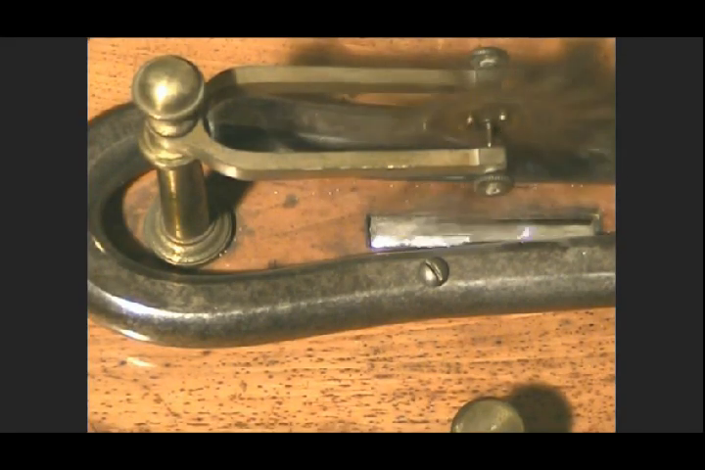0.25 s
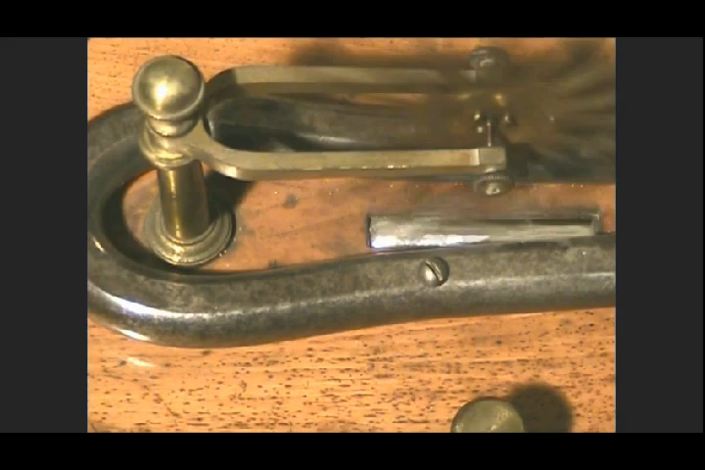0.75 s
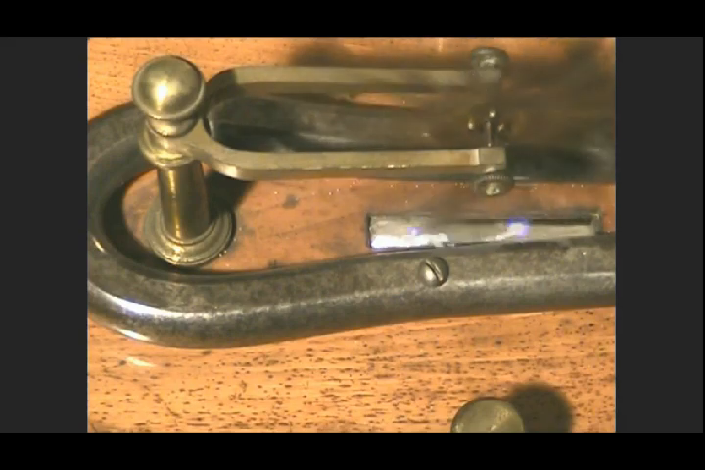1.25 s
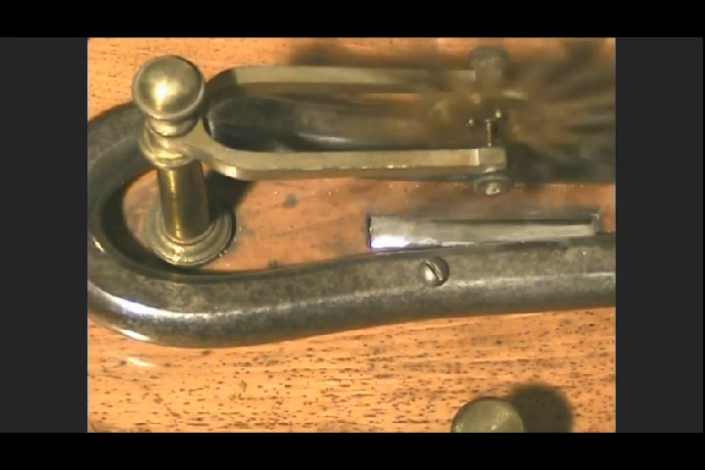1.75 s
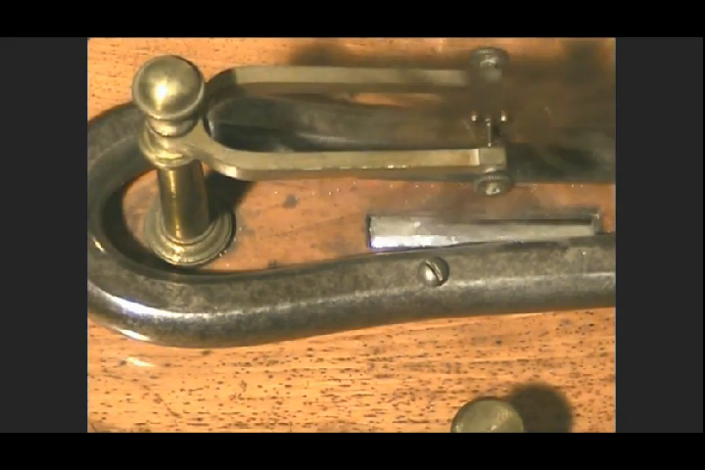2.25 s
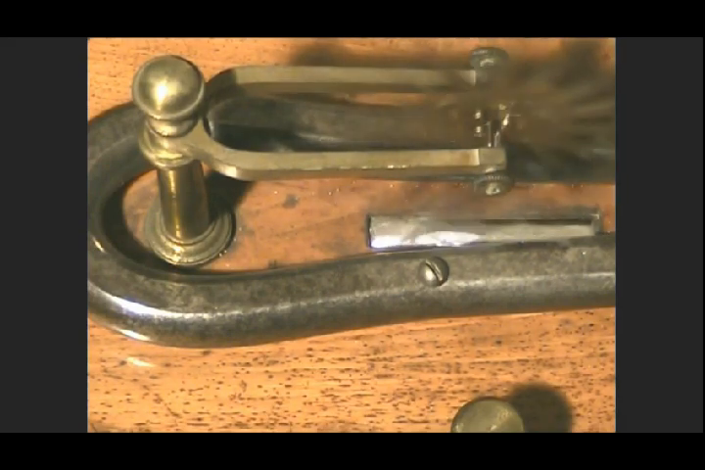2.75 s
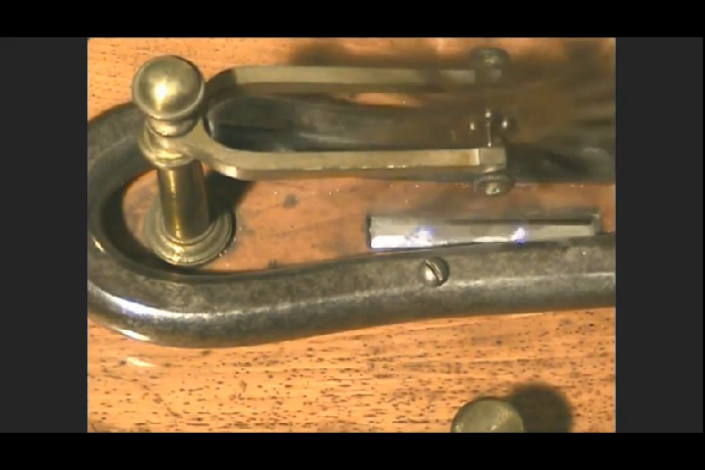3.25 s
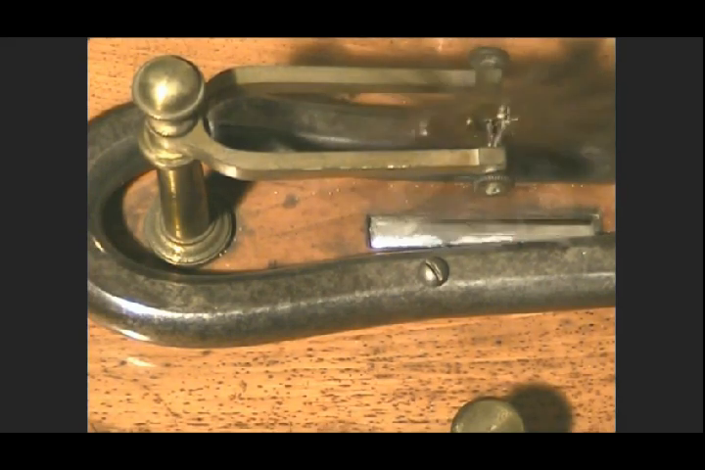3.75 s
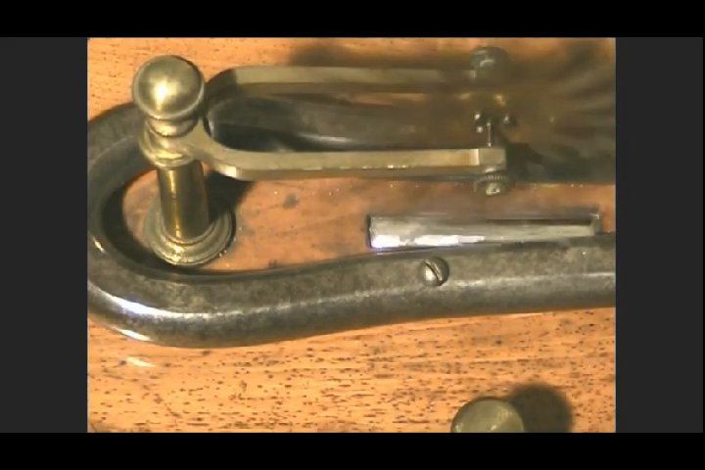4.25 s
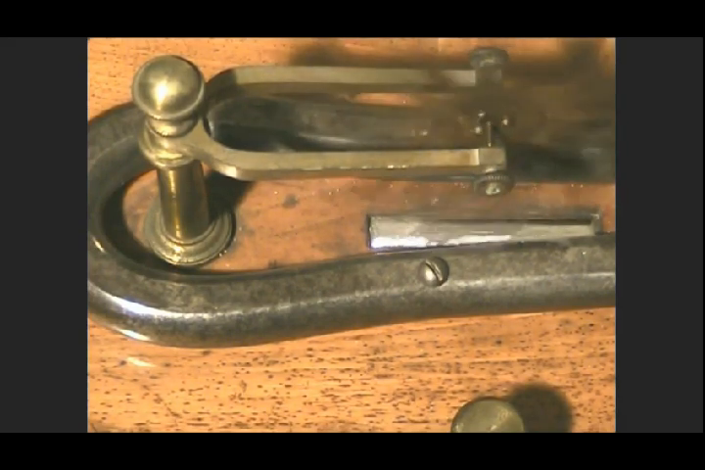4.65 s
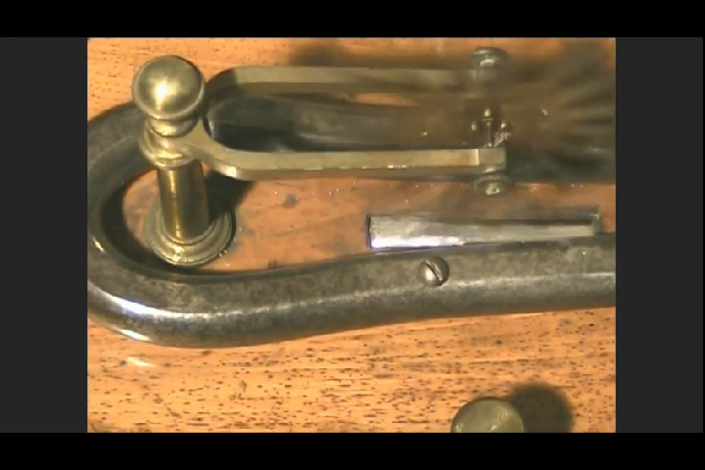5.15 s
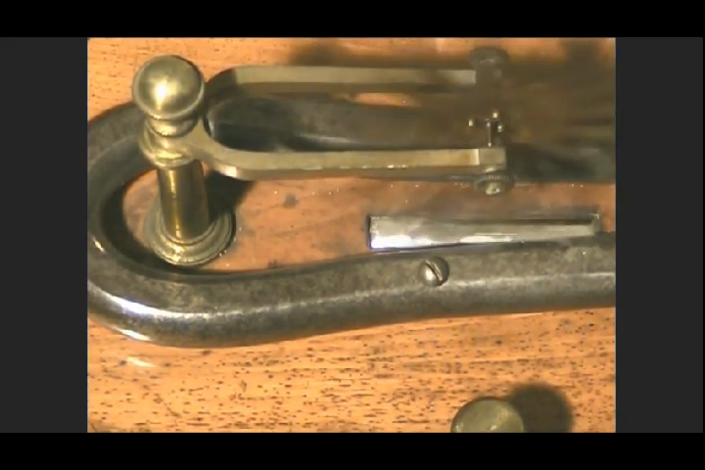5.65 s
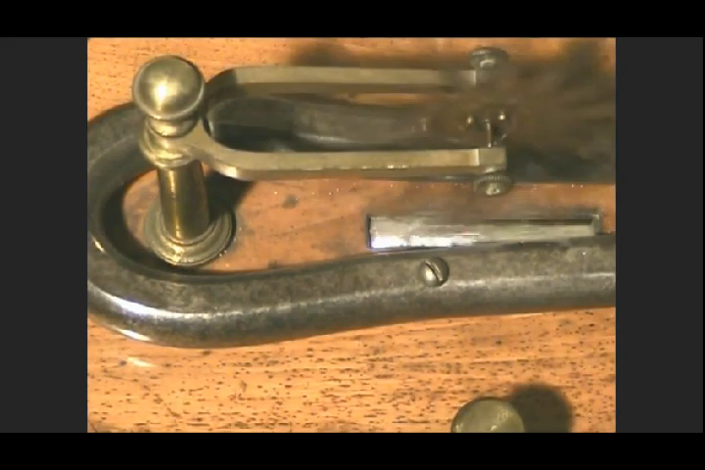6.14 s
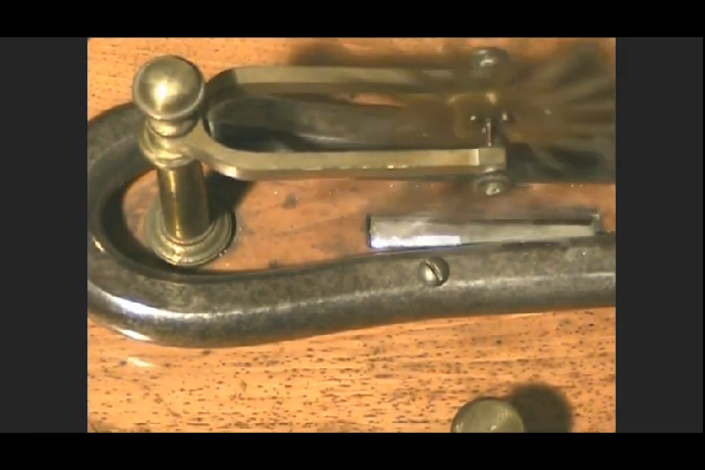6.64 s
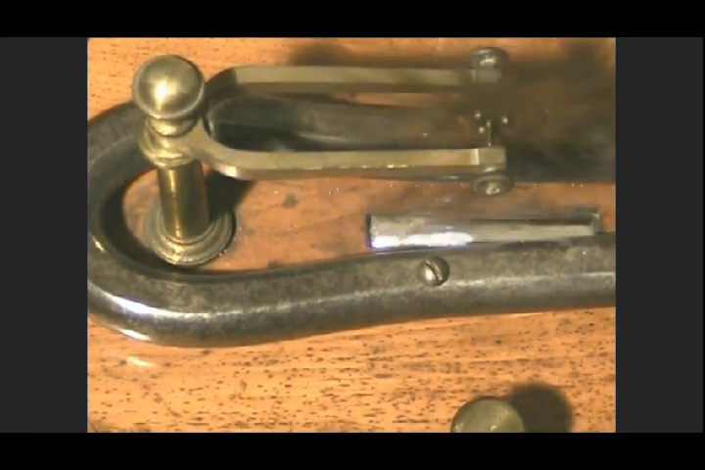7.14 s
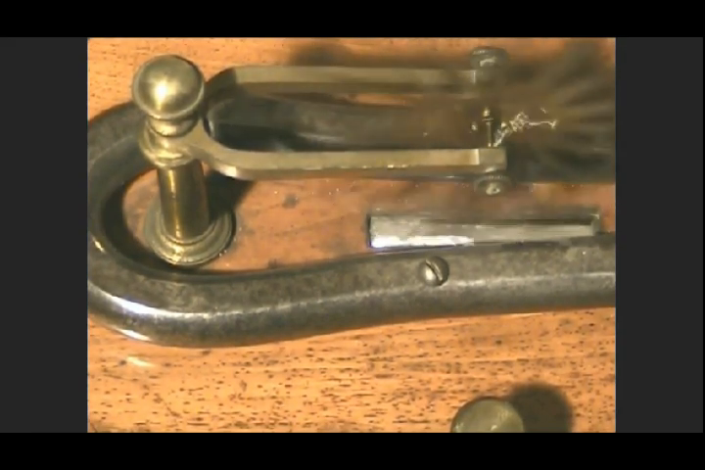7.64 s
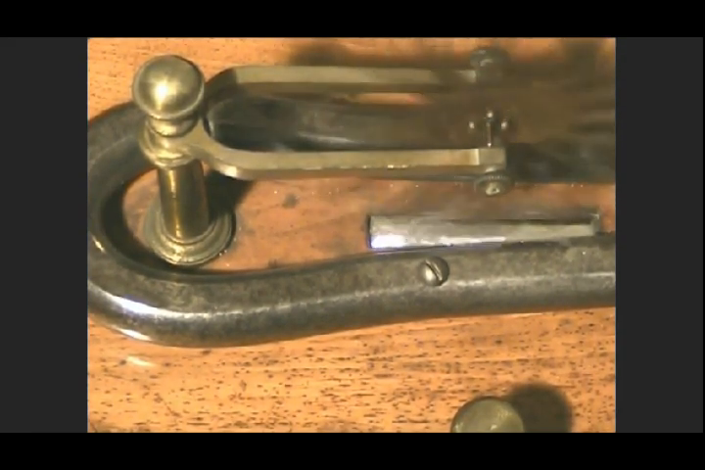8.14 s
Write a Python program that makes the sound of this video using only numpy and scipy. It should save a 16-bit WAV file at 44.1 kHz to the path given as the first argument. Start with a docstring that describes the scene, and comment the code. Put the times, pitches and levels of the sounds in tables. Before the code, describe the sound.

A small toothed metal wheel buzzes and rattles at a hundred pulses a second, with sharp irregular electric spark snaps in a small room.

```python
"""In a small room, a toothed copper wheel on rectified mains current dips through mercury on a wooden base.
Impulses at the sparks, where a tooth leaves the mercury, excite housing, body and base resonances.
Each current hump, a hundred a second, jolts the axle in its brass fork: noise and impulses ring the frame
near 1.5 kHz and make the wheel chatter; clear knocks and soft singing swells of the fork stand out.
The room adds echoes, hum and rumble; hiss, narrow drones and a camcorder's faint tick lie underneath."""
import sys
import numpy as np
from scipy import signal
from scipy.fft import rfft, irfft, next_fast_len
from scipy.io import wavfile
from scipy.ndimage import uniform_filter1d

SR = 44100
rng = np.random.default_rng(int(sys.argv[2]) if len(sys.argv) > 2 else 0)


def pcm_store(signal):
    """Save signal as 16-bit PCM."""
    levels = np.round(np.clip(np.atleast_2d(signal), -1, 1) * 32767)
    wavfile.write(sys.argv[1], SR, levels.astype(np.int16).T)


N = 369999

# spectral shape of the room's hum in the centre: pitch_hz [Hz], shape_db [dB per Hz, relative]
HUM_MID_SHAPE = [(20, -24), (55, -3), (115, -7.5), (180, -0.5), (290, -6.5), (430, -9), (700, -15),
                 (950, -8), (1200, -43)]
# spectral shape of the hum that differs between the channels: pitch_hz [Hz], shape_db [dB per Hz, relative]
HUM_SIDE_SHAPE = [(20, 2), (35, -5), (120, 0.5), (280, -0.5), (1200, -10.5), (2300, -13.5), (3450, -15.5),
                  (3600, -56)]
# spectral shape of the microphone hiss: pitch_hz [Hz], shape_db [dB per Hz, relative]
HISS_SHAPE = [(600, -38), (1000, 10), (3500, -3), (9000, -18), (12000, -11), (16000, -27)]
HUM_MID_DB, HUM_SIDE_DB, HISS_DB = -53, -51, -57  # rms
# narrow drones of the room and the camcorder: pitch_hz [Hz], width_hz [Hz], level_db [dB rms]
DRONE_BANDS = [(153.9, 3, -58.5), (210.8, 10.8, -56), (252.6, 16, -61.5), (364.8, 13, -59.5),
               (399.4, 5.7, -63), (501.7, 1.36, -71.5), (576.6, 10.4, -66.5)]

HUMP_HZ, HUMP_START_S = 100.03, .005
# chance scatter from hump to hump of the jolt and of the chatter
JOLT_SCATTER_DB, SCRAPE_SCATTER_DB = 4, 3.5
# gain of the buzz between knocks: time_s [s], gain_db [dB]
BUZZ_GAIN = [(0, -44.5), (0.26, -42), (0.72, -44.5), (1.1, -44), (1.45, -43), (1.82, -43), (2.15, -44),
             (2.55, -41.5), (3.2, -43.5), (3.48, -44), (3.75, -42.5), (4.15, -41.5), (4.58, -44),
             (5.0, -41.5), (5.35, -44), (5.7, -43), (6.24, -40.5), (6.72, -46), (6.98, -44), (7.45, -43),
             (7.8, -42.5), (8.39, -45)]
# dips of the buzz that end at once: start_s [s], end_s [s], depth_db [dB, reached if the dip lasts 21 ms]
BUZZ_PAUSES = [(0.0, 0.055, -8.5), (0.436, 0.478, -7), (0.714, 0.775, -11), (1.183, 1.213, -10),
               (1.614, 1.686, -7.5), (1.889, 1.93, -15), (2.23, 2.321, -15), (3.024, 3.074, -10),
               (3.291, 3.395, -10), (3.409, 3.455, -13), (3.552, 3.64, -10.5), (3.642, 3.665, -15),
               (4.12, 4.169, -12.5), (4.181, 4.2, -20), (4.226, 4.244, -17), (4.293, 4.365, -7),
               (5.031, 5.074, -16), (5.116, 5.15, -16), (5.473, 5.495, -20), (5.508, 5.558, -15),
               (5.697, 5.715, -17), (5.883, 5.91, -15), (6.34, 6.369, -9), (6.384, 6.412, -17),
               (6.684, 6.712, -24), (6.736, 6.773, -11), (6.763, 6.85, -12), (6.973, 7.052, -14.5),
               (7.098, 7.123, -35), (7.963, 8.036, -13), (8.284, 8.313, -18)]
BEARING_HZ = 1550  # the bearing passes force best around this
# close modes of the frame: pitch_hz [Hz], width_hz [Hz], gain_db [dB, relative]
FRAME_MODES = [(1471.3, 125, -0.5), (1541, 58.7, 7), (1627, 63, 3.5), (1658.3, 140, -6)]
# slender modes of the fork that ring on: pitch_hz [Hz], width_hz [Hz], gain_db [dB, relative]
FORK_MODES = [(902.5, 46, -15), (1078, 34.3, -3.5), (1320, 13, -11.5), (1880, 48, -17.5)]
# upper modes of wheel and fork: pitch_hz [Hz], width_hz [Hz], gain_db [dB, relative]
WHEEL_MODES = [(2532, 183, 5), (2922, 68, 10), (3138, 103, 5.5), (3437, 47, 5), (3720, 83, 4.5),
               (4004, 163, 5), (4794, 450, 0.5), (5533, 123, 2), (6140, 330, 4.5), (6923, 130, 7.5),
               (7200, 200, 3.5), (7880, 760, 4.5), (8900, 1750, -4), (9570, 154, 5), (10520, 650, 1),
               (12300, 2900, -18)]

# the tick repeats a bar of uneven beats
TICK_BAR_S, TICK_START_S = .18008, .031
# beats within the bar: start_s [s]
TICK_BEATS = [0, .04, .08, .14]
TICK_DB, TICK_SCATTER_DB = -49, 4  # typical peak, and its chance scatter

# clear knocks of the axle: start_s [s], ring_db [dB peak], chatter_db [dB against the ring, before a 4 dB cut]
AXLE_KNOCKS = [(0.1158, -32, -17), (0.134, -30, -32), (0.184, -30, -27), (0.1976, -32, -24),
               (0.2648, -31.5, -6), (0.286, -32.5, -1.5), (0.3032, -31, -16), (0.3253, -29, -14),
               (0.6131, -28.5, -12), (0.7149, -32.5, -18), (0.8075, -31, -5), (0.9734, -30.5, -14),
               (0.9853, -29.5, -17), (1.016, -32, -9), (1.074, -32, -20), (1.135, -32, -4),
               (1.3242, -29.5, -24), (1.4258, -27.5, -11), (1.4555, -25.5, -14.5), (1.4948, -27.5, -10),
               (1.5338, -30, -7), (1.6855, -28.5, -12.5), (1.7135, -31, -29), (1.794, -30, -15),
               (1.815, -28.5, -23), (1.936, -28.0, -13), (1.9756, -30.5, -8.5), (2.095, -30.0, -26),
               (2.1829, -31, -15), (2.2053, -33, -18), (2.394, -29.5, -17), (2.4427, -31.5, -26),
               (2.5242, -29, -16), (2.5452, -26, -14), (2.564, -30, -25), (2.5822, -27.5, -24),
               (2.6838, -32.5, -6.5), (2.6931, -26.5, -16), (3.0248, -27.5, -14), (3.123, -29, -13),
               (3.2083, -29.5, -13), (3.7562, -25, -17), (3.783, -29, -17), (3.8224, -31.5, -20),
               (3.9634, -28, -13), (3.983, -27.5, -22), (4.121, -30.5, -16), (4.253, -29, -12),
               (4.2747, -30, -19), (4.3135, -29, -9.5), (4.4045, -29.5, -13), (4.513, -30.5, -18),
               (4.853, -27, -16.0), (4.8723, -28.0, -17), (4.953, -26.5, -14), (5.093, -27.5, -17),
               (5.155, -28.5, -10), (5.253, -28, -15), (5.3328, -29.5, -13), (5.371, -29, -14),
               (5.385, -28.5, -13), (5.463, -30.5, -14), (5.4735, -28, -16), (5.631, -31, -19),
               (5.8246, -29.5, -21), (6.0864, -34, -22), (6.1219, -30, -17), (6.191, -34, -16),
               (6.233, -29, -14), (6.262, -31.5, -14), (6.3418, -27.5, -29), (6.4513, -31.0, -9.0),
               (6.722, -30.5, -7), (6.8522, -31, -17), (6.9424, -28, -11), (7.3136, -28.5, -21),
               (7.3436, -30, -14.0), (7.3829, -27.5, -21), (7.4327, -29.5, -27), (7.452, -30.5, -16),
               (7.462, -28, -13), (7.49, -29, -20), (7.501, -31.0, -12), (7.582, -31, -19),
               (7.609, -31.5, -14), (7.624, -30, -18), (7.7527, -29, -12), (7.7715, -36, -11),
               (7.821, -33, -16), (7.9029, -29, -16), (8.043, -32, -8), (8.3297, -28, -30)]

# sparks: start_s [s], level_db [dB], then against that level:
# lower_housing_db [dB], body_db [dB], base_knock_db [dB]
SPARK_EVENTS = [(0.1555, -26, 1, -26, -18.0), (0.288, -23.5, 5, -5, -18.0), (0.556, -3.5, 2.5, -17, -7.5),
                (0.7836, -30.5, 8, -9, -18.0), (0.8564, -0.5, -1, -14, -14), (1.1292, -12.5, 2, -13, -14),
                (1.2749, -16.5, 6, -6, -22), (1.2765, -10.5, -14, -13.5, -23), (1.279, -7, 1.5, -12.5, -28),
                (1.7882, -10.5, 0.0, -14.5, -18), (2.0434, -11, -1.5, -16, -27),
                (2.0515, -23, 6.0, -9, -18.0), (2.125, -23, 5.5, -10.0, -18.0),
                (2.7743, -7.5, 3, -13.5, -18), (2.9337, -8.5, 2.5, -12.5, -12), (2.9984, -4, -34, -17, -31),
                (3.1754, -2, 0.5, -15, -16), (3.2563, -1, -2.5, -14, -31), (3.674, -16.5, 8, -10.5, -16),
                (4.0729, -13.5, 1.5, -15, -23), (4.0836, -24, 8, -8, -18.0),
                (4.374, -3.5, 1.5, -13.5, -11.5), (5.0737, -32.0, 7.0, -3, -18.0),
                (5.0824, -26.5, 2, -5, -18.0), (5.2431, -5, 2, -12, -33), (5.3127, -17.5, -5, -11, -16),
                (5.5746, -4.5, 1, -12, -14.5), (6.4254, -15.5, 10.5, -10, -12),
                (6.5036, -5.5, -1, -12.5, -14), (6.592, -22.5, 0, -9, -20), (6.594, -28, 6, -12.0, -18.0),
                (6.863, -2.5, -2, -15, -13.0), (7.7757, -14.5, 1.0, -10, -21), (7.855, -3.5, 0, -15, -13.5),
                (8.1139, -1.0, 1, -14, -14)]
# a spark's bounces off magnet and base: delay_ms [ms], gain [ratio, negative when inverted]
SPARK_BOUNCES = [(.34, 0.26), (0.401, 0.14), (.50, -0.023), (.80, 0.053), (1.2, -0.0064)]
# resonances of the microphone housing: pitch_hz [Hz], width_hz [Hz], gain_db [dB, relative]
HOUSING_MODES = [(10790, 1100, 15), (13200, 740, 8), (14650, 1300, 11)]

# swells of the fork's main mode: start_s [s], length_s [s], level_db [dB rms over the swell]
FORK_SINGS = [(0.2, 0.29, -55), (1.356, 0.19, -49), (1.927, 0.15, -54), (2.325, 0.074, -52),
              (2.843, 0.22, -55), (3.89, .17, -61.5), (4.91, 0.35, -57), (6.217, 0.091, -50.5),
              (6.884, 0.077, -54.5), (7.39, 0.21, -58)]

# echoes off near surfaces: delay_ms [ms], gain_db [dB], top_hz [Hz]
WALL_ECHOES = [(5.6, -16.5, 5500), (8.8, -20, 6470)]
# decay time of the tail; gain of its noise before filtering; further gain of its part unlike between channels
ROOM_T60_S, ROOM_DB, ROOM_SIDE_DB = 0.3, -37.5, -7

LEFT_DB = .95  # left against right, below about 3.5 kHz
TOP_HZ = 16500


def undb(db):
    """Logarithmic amplitude scale: decibels to gain."""
    return 10 ** (np.asarray(db, float) / 20)


def level(x, db):
    """Mean-square power: scale a signal to the given rms level."""
    return x * undb(db) / np.sqrt(np.mean(x ** 2))


def ring(x, modes):
    """Modal superposition: resonances with dB gain at the centre, neighbours in opposite phase."""
    out = 0
    for k, (pitch_hz, width_hz, gain_db) in enumerate(modes):
        b, a = signal.iirpeak(pitch_hz, pitch_hz / width_hz, SR)
        out = out + (-1) ** k * undb(gain_db) * signal.lfilter(b, a, x)
    return out


def strikes(start_s, size):
    """Impulsive excitation: impulses of given size at the given times."""
    out = np.zeros(N)
    index = np.clip((np.asarray(start_s) * SR).astype(int), 0, N - 1)
    np.add.at(out, index, size)
    return out


def fade(x, rise_s, fall_s):
    """Exponential relaxation: smear impulses into bumps of peak 1 that rise and die away."""
    t = np.arange(int(8 * fall_s * SR)) / SR
    bump = (1 - np.exp(-t / rise_s)) * np.exp(-t / fall_s)
    return np.abs(signal.fftconvolve(x, bump / bump.max())[:N])


def wander(db):
    """Slow random modulation: a gain that drifts several times a second by db rms."""
    drift = uniform_filter1d(rng.standard_normal(N), size=2500)
    drift = uniform_filter1d(drift, size=2500)
    return undb(level(drift, 0) * db)


def coloured(points, db):
    """Spectral shaping: steady noise whose spectrum follows the points, set to an rms level."""
    pitch_hz, shape_db = np.transpose(points)
    size = next_fast_len(N)
    f = np.maximum(np.arange(size // 2 + 1) * SR / size, 1)
    gain = undb(np.interp(np.log(f), np.log(pitch_hz), shape_db, -90, -90))
    noise = rng.standard_normal(size)
    return level(irfft(rfft(noise) * gain, size)[:N], db)


def drones():
    """Narrow-band noise: each resonance filters noise into a drone of drifting strength."""
    out = 0
    for pitch_hz, width_hz, level_db in DRONE_BANDS:
        band = ring(rng.standard_normal(N), [(pitch_hz, width_hz, 0)])
        out = out + level(wander(2.4) * band, level_db)
    return out


def rumble():
    """Low resonance under random force: narrow rumble near 35 Hz with one swell of 11 dB."""
    swell_db = 11 * np.exp(-((np.arange(N) / SR - 4.38) / .18) ** 2)
    low_noise = ring(rng.standard_normal(N), [(35.0, 7.8, 0)])
    return undb(swell_db) * level(low_noise, -59.0)


def looseness():
    """Amplitude modulation: gain of the buzz over time, sinking into each pause."""
    t = np.arange(N) / SR
    db = np.interp(t, *np.transpose(BUZZ_GAIN))
    for start_s, end_s, depth_db in BUZZ_PAUSES:
        db += depth_db * np.clip((t - start_s) / 0.021, 0, 1) * (t < end_s)
    return undb(db)


def frame(force):
    """Coupled resonators: the bearing filters the force on the frame; twice-filtered fork modes add to it."""
    fork = 0
    for pitch_hz, width_hz, gain_db in FORK_MODES:
        once = ring(force, [(pitch_hz, width_hz, 0)])
        fork = fork + ring(once, [(pitch_hz, width_hz, gain_db)])
    through_bearing = ring(force, [(BEARING_HZ, 330, 0)])
    return ring(through_bearing, FRAME_MODES) + fork


def buzz(when_s, jolt_db, loose):
    """Periodic forced vibration: each hump pushes noise and one impulse into the frame."""
    push = fade(strikes(when_s, undb(jolt_db)), 0.00023, 0.0031) + 0.2
    shake = push * rng.standard_normal(N) + strikes(when_s, undb(jolt_db + 25.0))
    # the pauses act on the force, so the frame rings on into them
    return frame(loose * shake) * undb(1.0) / np.std(frame(shake))


def chatter(when_s, jolt_db, lucks, loose):
    """Frictional contact noise: many tiny contacts during each push, with a tick at its start."""
    out = 0
    # the lower and the upper modes are set off unevenly from hump to hump
    for modes, luck in zip((WHEEL_MODES[:7], WHEEL_MODES[7:]), lucks):
        scrape_db = jolt_db + SCRAPE_SCATTER_DB * luck
        scrape = fade(strikes(when_s, undb(scrape_db)), 0.0003, 0.0055) + 0.34
        grit = rng.standard_normal(N) * undb(3.7 * rng.standard_normal(N))
        ticks = strikes(when_s, undb(scrape_db + 20.5))
        force = loose * (scrape * grit + ticks)
        # as the wheel turns, each mode comes and goes
        for k, mode in enumerate(modes):
            out = out + (-1) ** k * wander(2.3) * ring(force, [mode])
    return level(out, -49)


def knocks():
    """Impact response: each blow rings the frame with either sign and sets off a burst of chatter."""
    start_s, ring_db, chatter_db = np.transpose(AXLE_KNOCKS)
    blow = frame(np.eye(1, 8192)[0])
    sign = np.sign(rng.standard_normal(len(start_s)))
    blows = strikes(start_s - .0008, sign * undb(ring_db))
    ringing = signal.fftconvolve(blows, blow / np.abs(blow).max())[:N]
    burst = fade(strikes(start_s - .001, undb(ring_db + chatter_db)), 0.00087, 0.0062)
    return ringing + burst * level(ring(rng.standard_normal(N), WHEEL_MODES), -4.0)


def singing():
    """Frequency-modulated sine: soft swells of the fork's main mode, its pitch wavering by 11 Hz rms."""
    t = np.arange(N) / SR
    waver_hz = level(uniform_filter1d(rng.standard_normal(N), size=1200), 20.77)
    gain = 0
    for start_s, length_s, level_db in FORK_SINGS:
        gain = gain + undb(level_db) * np.sin(np.pi * np.clip((t - start_s) / length_s, 0, 1))
    phase = 2 * np.pi * np.cumsum(FORK_MODES[1][0] + waver_hz) / SR
    return 2 * gain * np.sin(phase)


def axle():
    """Excitation by current humps: each jolts the axle by a chance amount; knocks and singing are added."""
    humps_s = np.arange(HUMP_START_S, N / SR, 1 / HUMP_HZ)
    chance = rng.standard_normal((4, len(humps_s)))
    when_s = humps_s + 0.0005 * chance[0]
    jolt_db = JOLT_SCATTER_DB * chance[1]
    loose = looseness()
    driven = buzz(when_s, jolt_db, loose) + chatter(when_s, jolt_db, chance[2:], loose)
    return driven + knocks() + singing()


def camera_tick():
    """Damped impulse response: two modes, each filtered twice, tick faintly in a limping rhythm."""
    bars_s = np.arange(TICK_START_S, N / SR - TICK_BAR_S, TICK_BAR_S)
    start_s = np.ravel(bars_s[:, None] + TICK_BEATS)
    scatter_db = TICK_SCATTER_DB * rng.standard_normal(len(start_s))
    modes = [(1990, 150, 0), (3050, 220, -5)]
    one = ring(ring(np.eye(1, 2048)[0], modes), modes)
    return signal.fftconvolve(strikes(start_s, undb(TICK_DB + scatter_db)), one / np.abs(one).max())[:N]


def sparks():
    """Impulse response with reflections: a snap and its bounces ring housing, broad body and wooden base."""
    start_s, level_db, lower_db, body_db, base_db = np.transpose(SPARK_EVENTS)
    hz = np.arange(129) * SR / 256
    # each bounce is a delay, written as a phase turn in the spectrum
    bounces = sum(gain * np.exp(-2j * np.pi * hz * ms / 1000) for ms, gain in SPARK_BOUNCES)
    snap = irfft(1 + bounces)
    lower, *uppers = (ring(snap, [mode]) for mode in HOUSING_MODES)
    upper = sum(uppers)
    housing_peak = np.abs(lower + upper).max()
    body = -ring(snap, [(4750, 8000, 4.6)])
    base_knock = -ring(snap, [(535, 1550, -2.0)])
    # body and base are both scaled by the body's peak within 2-5 kHz
    band = signal.butter(2, [2000, 5000], "band", fs=SR)
    body_peak = np.abs(signal.lfilter(*band, body)).max()
    parts = [(0, upper / housing_peak), (lower_db, lower / housing_peak),
             (body_db, body / body_peak), (base_db, base_knock / body_peak)]
    out = 0
    for part_db, part in parts:
        hits = strikes(start_s - 5 / SR, undb(level_db + part_db))
        out = out + signal.fftconvolve(hits, part)[:N]
    return out


def room(x):
    """Reflection and reverberation: two dull echoes, then a dense noise tail whose treble dies first."""
    t = np.arange(int(.5 * SR)) / SR
    fall = np.exp(-np.log(1000) * t / ROOM_T60_S) * (1 - np.exp(-t / 0.0003))
    out = 0
    for delay_ms, gain_db, top_hz in WALL_ECHOES:
        delayed = np.roll(x, int(delay_ms * SR / 1000))
        out = out + undb(gain_db) * signal.lfilter(*signal.butter(2, top_hz, fs=SR), delayed)
    # contact is made at ever other spots, so the tail's fine pattern keeps changing among four
    for k in range(4):
        share = np.maximum(np.cos(2 * np.pi * (np.arange(N) / SR / .31 - k / 4)), 0)
        low, high, side = rng.standard_normal((3, len(t))) * fall * undb(ROOM_DB)
        low = signal.lfilter(*signal.butter(4, 9500, fs=SR), low)
        high = signal.lfilter(*signal.butter(1, [10000, 16000], "band", fs=SR), high)
        mid = low + high * np.exp(-t / 0.031) * undb(1.0)
        # the channels differ only in the tail's lower part
        side = signal.sosfilt(signal.ellip(8, .5, 60, 3500, fs=SR, output="sos"), side)
        side = undb(ROOM_SIDE_DB) * side
        out = out + np.array([signal.fftconvolve(share * x, mid + sign * side)[:N] for sign in (1, -1)])
    return out


def scene():
    """Mid-side superposition: the wheel in the middle; side hum and ticks opposed between the channels."""
    hum_and_hiss = coloured(HUM_MID_SHAPE, HUM_MID_DB) + coloured(HISS_SHAPE, HISS_DB)
    background = hum_and_hiss + drones() + rumble()
    metal = axle()
    side = coloured(HUM_SIDE_SHAPE, HUM_SIDE_DB) + camera_tick()
    snap = sparks()
    # sparks reach the left channel a little earlier (slope term) and louder
    side = side + undb(-23) * np.gradient(snap) + undb(-28) * snap
    mid = snap + metal + background
    return mid + side * np.array([[1], [-1]]) + room(snap + undb(-2) * metal)


def record(dry):
    """Linear filtering: the left channel is a little stronger below the treble; a low-pass cuts the top."""
    low = signal.sosfiltfilt(signal.ellip(8, .5, 60, 3500, fs=SR, output="sos"), dry)
    balance_db = np.array([[LEFT_DB], [-LEFT_DB]]) / 2
    tilted = dry + (undb(balance_db) - 1) * low
    return signal.sosfilt(signal.ellip(8, .2, 70, TOP_HZ, fs=SR, output="sos"), tilted)


dry = scene()
out = record(dry)
pcm_store(out)
```